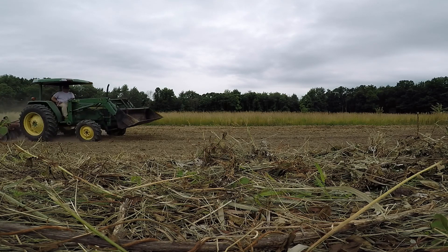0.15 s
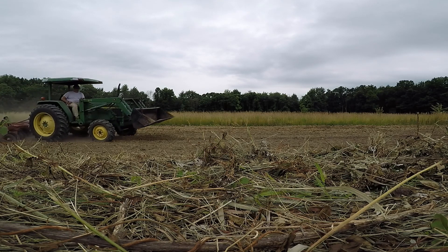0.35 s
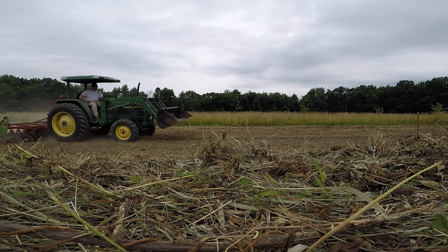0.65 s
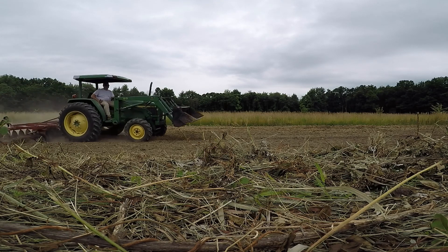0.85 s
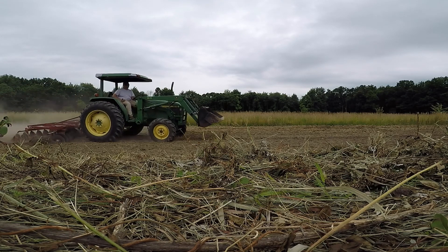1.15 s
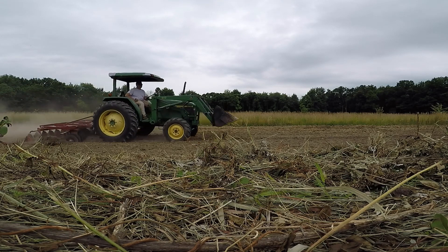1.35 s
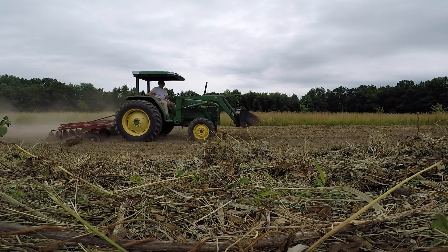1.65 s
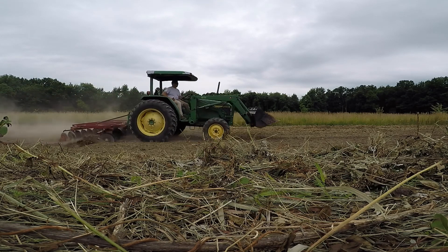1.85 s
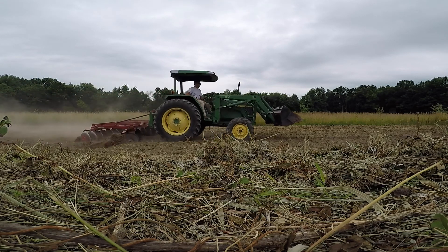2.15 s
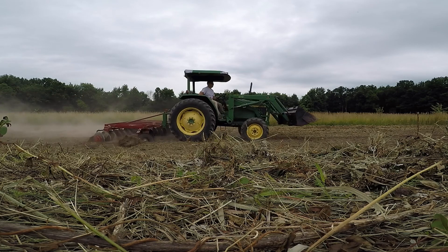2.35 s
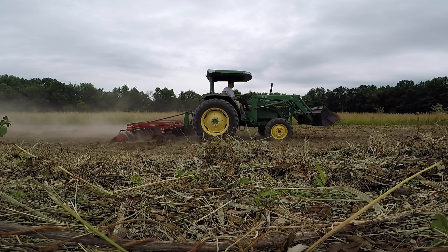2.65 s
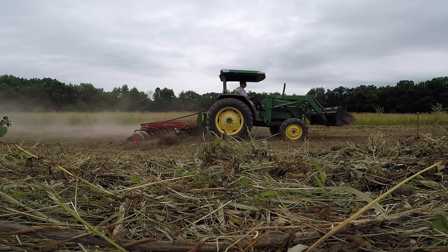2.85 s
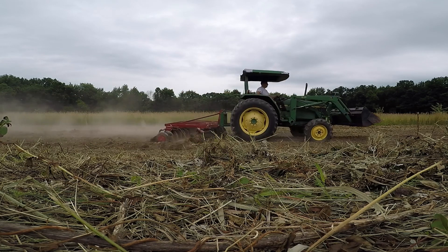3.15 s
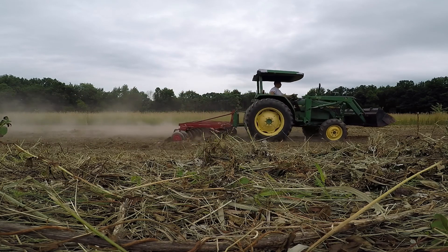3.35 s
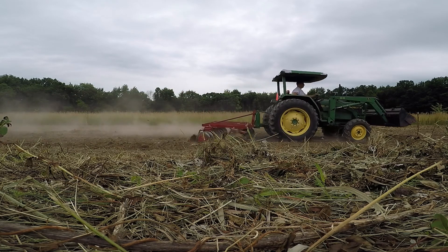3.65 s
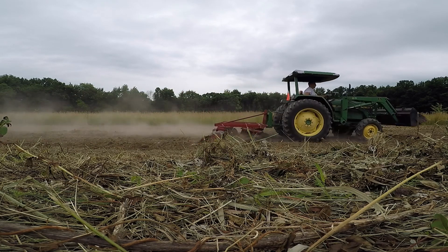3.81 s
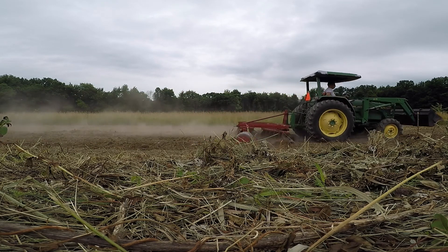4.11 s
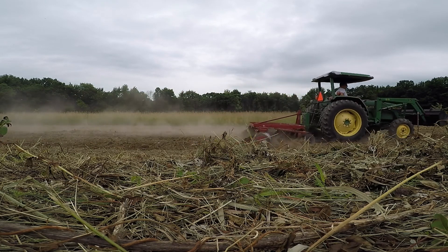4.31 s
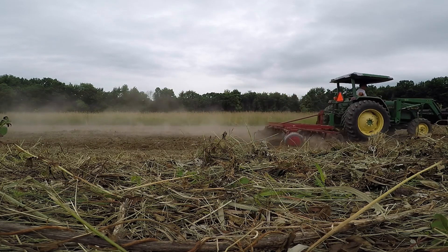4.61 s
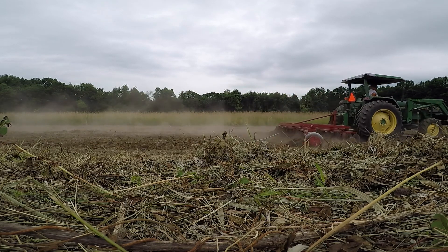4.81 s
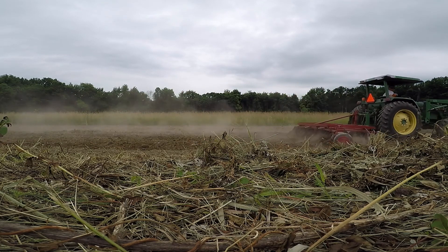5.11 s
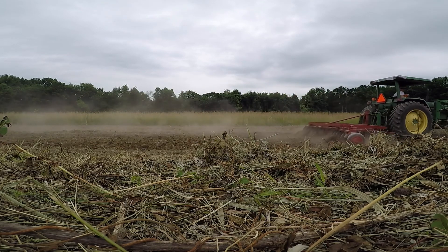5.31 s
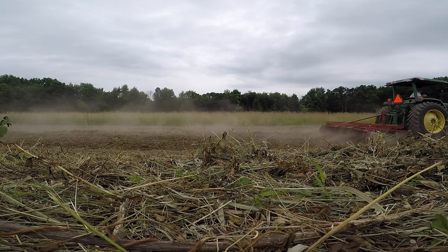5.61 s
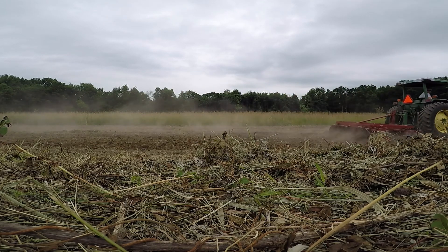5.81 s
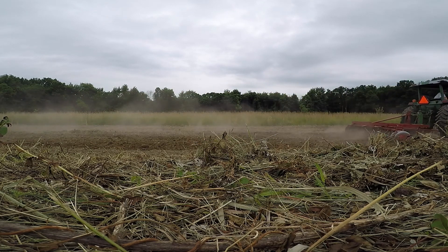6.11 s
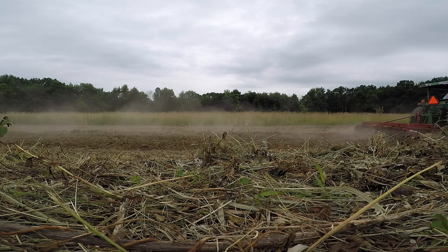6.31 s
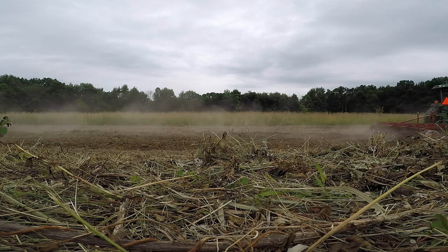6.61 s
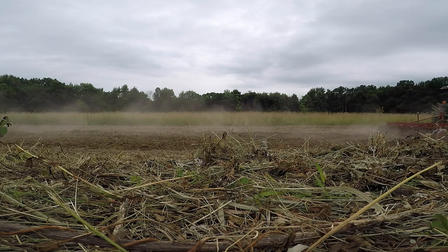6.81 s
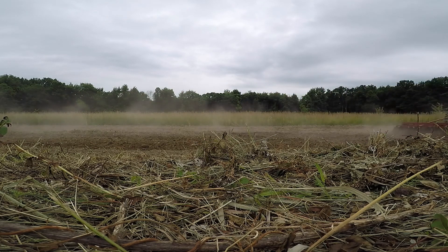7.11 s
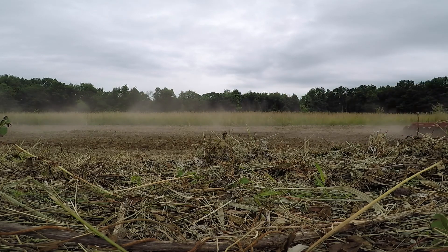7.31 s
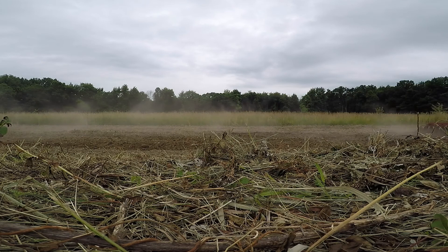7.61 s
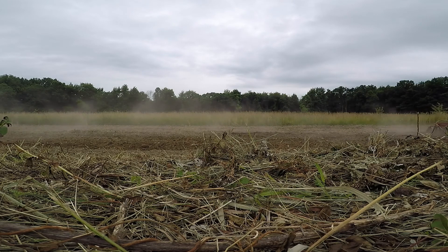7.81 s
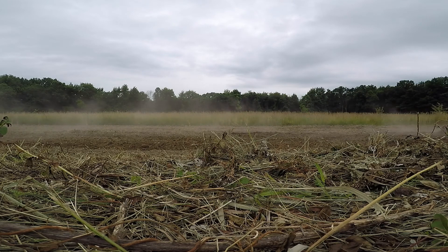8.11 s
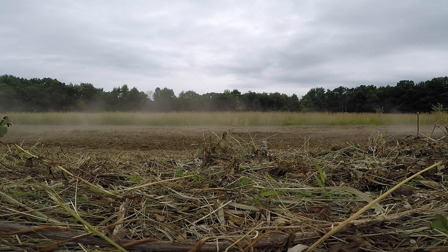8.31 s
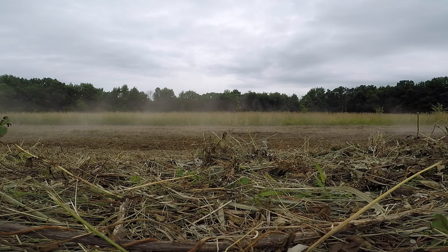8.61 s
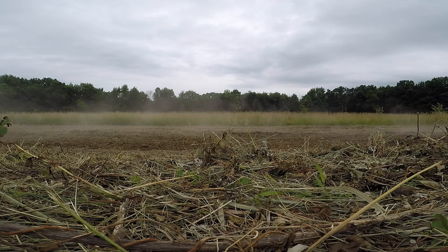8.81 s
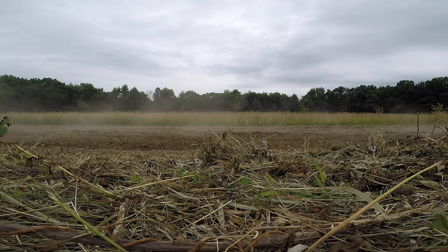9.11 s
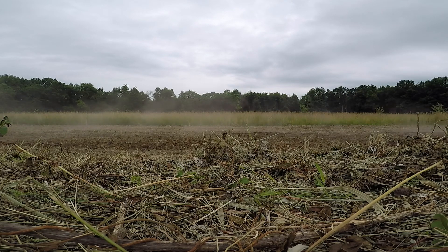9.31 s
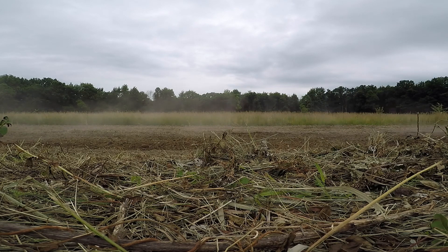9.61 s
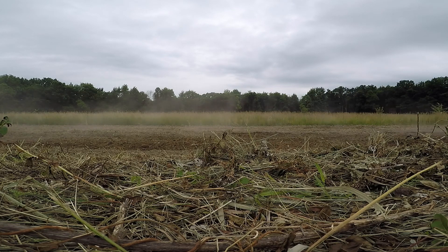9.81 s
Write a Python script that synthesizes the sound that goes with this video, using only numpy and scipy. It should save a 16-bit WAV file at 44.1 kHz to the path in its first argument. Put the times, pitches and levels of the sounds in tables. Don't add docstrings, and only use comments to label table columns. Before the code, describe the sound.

A diesel tractor throbs past from left to right, dragging hissing, squeaking, cracking discs through dry soil, then fades away over an open field.

```python
import sys
import numpy as np
from scipy import signal
from scipy.fft import rfft, irfft, next_fast_len
from scipy.io import wavfile
from scipy.ndimage import uniform_filter1d

SR = 44100
rng = np.random.default_rng(int(sys.argv[2]) if len(sys.argv) > 2 else 0)


def invert_db(level):
    return 10 ** (np.asarray(level, dtype=float) / 20)


def to_wav(sig):
    pcm = np.clip(np.atleast_2d(sig), -1, 1) * 32767
    pcm = np.round(pcm).astype(np.int16)
    wavfile.write(sys.argv[1], SR, pcm.T)


N = 438779
SIZE = next_fast_len(N)
TIME = np.arange(N) / SR
FFT_HZ = np.arange(SIZE // 2 + 1) * SR / SIZE


def rms_one(x):
    return x / np.sqrt(np.mean(x ** 2) + 1e-20)


def in_time(rows):
    s, *columns = np.transpose(rows)
    return [np.interp(TIME, s, c) for c in columns]


def at_hz(points):
    hz, *columns = np.transpose(points)
    return [np.interp(np.log(FFT_HZ + 1), np.log(hz), c) for c in columns]


def band(low_hz, high_hz):
    hz = FFT_HZ + 1
    return 1 / np.sqrt((1 + (low_hz / hz) ** 12) * (1 + (hz / high_hz) ** 12))


def drift(rate):
    r = np.exp(-80 * np.pi * rate / SR)
    noise = rng.standard_normal(N // 40 + 2002)
    slow = signal.lfilter([1], [1, -2 * r, r * r], noise)[2000:]
    return np.interp(np.arange(N) / 40, np.arange(len(slow)), rms_one(slow))


# time in seconds, bearing (0 left, 1 ahead, 2 right, 3 far right).
BEARING = [(0, 0), (1.5, 0.24), (2.3, 1), (3.4, 1.37), (4.2, 1.95), (6.3, 2), (7.6, 3), (9.95, 3)]
# time in seconds, loss in dB.
DISTANCE = [(0, 0), (.8, 0.2), (2.1, -0.1), (3, -1.5), (4.85, -4.5), (6.1, -7), (7.5, -13), (8.6, -15.5),
            (9.95, -18)]
SEEN_FROM = [0, .08, .3, 1, 2, 3]


def heard(source):
    share, *side_db = source
    return np.interp(in_time(BEARING)[0], SEEN_FROM, side_db) + share * in_time(DISTANCE)[0]


def beamed(beams, off_db):
    levels = [off_db]
    for start, end, db in beams:
        outside_s = np.maximum(0, np.maximum(start - TIME, TIME - end))
        levels.append(db - 27.5 * outside_s)
    return np.max(levels, axis=0)


def knocks(cycles, knock_db):
    fading = np.clip(1.2 - cycles / cycles[-1], 0, 1)
    each_firing = knock_db * fading * np.cos(8 * np.pi * cycles)
    return invert_db(each_firing + 0.14 * np.cos(2 * np.pi * cycles))


# frequency in Hz, left and right level in dB per Hz.
FROM_LEFT = [(180,-46,-44.5),(656,-64,-64),(1010,-60,-70),(1970,-51.5,-56.5),(2700,-59,-60),(3480,-57.5,-60),(3570,-60.5,-56),(4250,-58.5,-62),(5250,-57.5,-65),(6100,-65,-65),(7300,-61.5,-70.5),(9640,-72.5,-72.5),(11800,-81,-89),(13200,-97,-101)]
FROM_AHEAD = [(187,-45,-43),(685,-67,-64.5),(1098,-65,-61),(1900,-58,-52.5),(2750,-63.5,-58.5),(3700,-65.5,-59),(4030,-74,-78),(4100,-70.5,-62.5),(5300,-57,-62),(6450,-62,-73),(7360,-59.5,-61),(10600,-69,-69),(12104,-79,-85),(13202,-86,-95)]
FROM_RIGHT = [(208,-51,-50),(684,-74,-65.5),(1000,-80,-62.5),(2200,-72,-57),(2770,-80,-63.5),(3630,-80.5,-66),(3800,-66,-85),(4370,-77.5,-63.5),(5500,-64,-71.5),(6600,-69,-69.5),(7440,-63,-64),(9530,-72.5,-69),(11700,-78,-83),(13200,-92,-87.5)]
# frequency in Hz, likeness from left, ahead, right (0 to 1).
LIKENESS = [(200, 1, 1, 1), (620, .97, .97, .9), (1500, .96, .96, .9), (3700, .96, .9, .98),
            (5300, .88, .88, .998), (6200, .6, .75, .995), (7800, .6, .75, .93), (9500, .35, .7, .75),
            (12000, .4, .6, .9), (14000, .2, .4, .4)]
# frequency in Hz, lag in radians from left, ahead, right, far right.
LAG = [(0, 0, 0, 0, 0), (600, -.6, .1, .6, .8), (1200, .2, -.3, -1.5, -1.7), (2000, .2, -.3, -2, -2.2),
       (2600, .3, -.2, -1.5, -1.7), (3300, .4, .7, 1.9, 2.2), (3700, .4, 1.8, 3.14, 3.14),
       (4200, .1, .3, 6.8, 6.8), (5300, 1.3, 2, 8.2, 9.42), (6100, 2.2, 2.8, 9.42, 10.8),
       (7400, 2, 4.1, 11.3, 11.6), (9300, 4.8, 6.3, 14.6, 15.7), (11800, 9.4, 9.4, 21, 22),
       (14000, 12, 12, 26, 26)]


def ports(side):
    table = (FROM_LEFT, FROM_AHEAD, FROM_RIGHT, FROM_RIGHT)[side]
    left, right = invert_db(np.array(at_hz(table)))
    alike = at_hz(LIKENESS)[min(side, 2)]
    hz, *lags = np.transpose(LAG)
    lag = np.interp(FFT_HZ, hz, lags[side])
    direct = np.array([left * alike * np.exp(-1j * lag), right])
    scattered = left * np.sqrt(1 - alike ** 2) * [[1], [0]]
    return direct, scattered


def wind():
    low = signal.butter(2, [18, 45], "band", fs=SR, output="sos")
    air = signal.sosfilt(low, rng.standard_normal((2, N)))
    return invert_db(-46 + 3.0 * drift(2.5)) * rms_one(air)


def soil(cycles):
    hits = rng.random(N) < 1500 / SR
    size_db = 3.5 * np.minimum(rng.exponential(1, N), 4)
    grit = hits * invert_db(size_db) * rng.choice([-1, 1], N)
    hiss = rng.standard_normal((2, N)) + 0.59 * rms_one(grit) * [[1], [0]]
    return invert_db(1.3 * drift(23)) * knocks(cycles, knock_db=0.93) * hiss


# start in seconds, peak in dB, dull part in dB against the bright part.
CRACKS = [(0.636, -19, -4), (0.7896, -20, -1.5), (3.0103, -17, -10), (3.1485, -20, 4), (3.2686, -15, -4),
          (3.6501, -18, -10), (3.7946, -21, -5), (4.084, -19, -1), (4.195, -27, 1), (4.256, -17, -2),
          (4.335, -11.5, 5), (4.8598, -11.5, -2), (4.9206, -18, -4), (5.052, -17, 1), (5.4161, -18, -9),
          (5.45, -17, -8), (5.5451, -18.5, 1.5), (5.5837, -16.5, -12), (5.7275, -19, -4), (6.1999, -18, -7),
          (6.8586, -26, 6), (6.9381, -21.5, -1), (7.009, -25, -4), (7.3819, -29, 8.5), (7.504, -28.5, 5),
          (7.9441, -24, -3), (8.1748, -22, -15), (8.4291, -27, -4), (8.844, -22.5, -3)]


def cracks():
    gains, t = np.zeros((2, N + SR)), np.arange(SR // 10) / SR
    shape = np.minimum(t / 0.0035, 1) * np.exp(-t / 0.0082)
    ticks = [(9.376 + k * 0.067, -22, -20) for k in range(4)]
    for s, peak_db, dull_db in [*CRACKS, *ticks]:
        burst = invert_db(peak_db + 3.5) * invert_db([[0], [dull_db]]) * shape
        gains[:, int(s * SR):][:, :len(t)] += burst
    bright, dull = rfft(gains[:, :N] * rng.standard_normal((2, N)), SIZE)
    return bright * band(5700, 9200) + dull * band(3300, 6970)


def tones(rows, rise_s, fall_s, early_s, octave_db):
    out, t = np.zeros(N + SR), np.arange(SR // 10) / SR
    shape = (1 - np.exp(-(t / rise_s) ** 2)) * np.exp(-(t / fall_s) ** 2)
    for s, peak_db, hz in rows:
        wave = np.sin(2 * np.pi * hz * t) + invert_db(octave_db) * np.sin(4 * np.pi * hz * t)
        out[int((s - early_s) * SR):][:len(t)] += invert_db(peak_db) * shape / shape.max() * wave
    return out[:N]


# start in seconds, peak in dB, pitch in Hz.
PINGS = [
    (.787, -23, 5040),
    (4.338, -29, 8750),
    (5.643, -22, 9300),
    (5.724, -17, 8380),
    (5.73, -24, 9150),
    (6.115, -28, 9290),
]


def pings():
    return tones(PINGS, rise_s=0.0017, fall_s=0.016, early_s=0, octave_db=-56)


# time of the peak in seconds, peak in dB, pitch in Hz.
SQUEAKS = [
    (0.3194, -22, 4250),
    (2.0133, -29, 4260),
    (2.3351, -25, 4195),
    (5.7273, -25.5, 4177),
    (5.9154, -33, 4325),
    (5.9399, -21.5, 4254),
    (6.1799, -20.5, 4240),
    (7.1758, -30.5, 4296),
    (8.0587, -32.5, 4210),
]


def squeaks():
    return tones(SQUEAKS, rise_s=0.0091, fall_s=0.018, early_s=0.0079, octave_db=-12)


def clatter(cycles, repeat, knock_db, uneven_db):
    favoured = np.clip(rng.standard_normal((12, 1201)), -1.5, 1.5)
    panels = rms_one(uniform_filter1d(rng.standard_normal((12, 1201)), size=6))
    order_db = uneven_db * favoured + 2.0 * np.clip(panels, -1.6, 1.6)
    patterns = rms_one(irfft(rfft(rng.standard_normal((12, 2400))) * invert_db(order_db)))
    where = (cycles % 1 * 2400).astype(int)
    age = cycles / cycles[-1] * 10.999
    now, share = age.astype(int), (age % 1) * np.pi / 2
    looped = np.cos(share) * patterns[now, where] + np.sin(share) * patterns[now + 1, where]
    fresh = np.sqrt(1 - repeat ** 2) * rng.standard_normal(N)
    return knocks(cycles, knock_db) * (repeat * looped + fresh)


# frequency in Hz, level in dB per Hz.
RUMBLE = [(15, -24), (30, -24), (50, -2), (100, 7.5), (200, 6.5), (300, -1), (420, -2), (600, -35)]
# share of the distance loss, then dB at each bearing of SEEN_FROM.
RUMBLING = (0.64, -36.5, -39, -35, -34.5, -32.5, -32.5)


def rumble(cycles):
    rough = clatter(cycles, repeat=0.25, knock_db=3.0, uneven_db=9.0)
    low = irfft(rfft(rough, SIZE) * invert_db(at_hz(RUMBLE)[0]), SIZE)[:N]
    return invert_db(heard(RUMBLING) + 10.5) * rms_one(low)


GEAR_ORDERS = [26.03, 39.45, 52.06, 57.85, 63.0, 77.25, 56.0, 93.5]
# beam start and end in seconds, level in dB.
GEAR_BEAMS = [
    [(0, .9, -40.5), (1.1, 1.5, -36.5), (2.5, 3.6, -37), (5.2, 6.2, -43.5), (8.5, 9.4, -53)],
    [(1.2, 1.5, -43), (3.9, 4.6, -38), (5.3, 6.65, -38.5), (6.8, 7.8, -47)],
    [(.5, 2.3, -45), (2.4, 3.21, -38)],
    [(.3, .9, -41), (2.5, 2.9, -40), (3.8, 4.2, -44), (7.25, 7.9, -45), (7.9, 9.4, -45.5)],
    [(.6, 1.5, -36), (2.5, 3.2, -39.5), (4.4, 4.8, -46)],
    [(1.2, 2.1, -36.5), (2.2, 3.6, -35.5), (5.0, 6.4, -47)],
    [(4.5, 5.0, -47), (5.35, 6.3, -44)],
    [(4.05, 4.45, -37)],
]


def gears(cycles):
    off_db = -47 + in_time(DISTANCE)[0]
    out = np.zeros(N)
    for order, beams in zip(GEAR_ORDERS, GEAR_BEAMS):
        level_db = beamed(beams, off_db) + 1.5 * drift(5.4)
        out += np.sqrt(2) * invert_db(level_db) * np.cos(2 * np.pi * order * cycles + 0.44 * drift(4))
    return out


# time in seconds, rate in Hz.
FIRING = [(0, 76.64), (2.1, 76.62), (3.3, 75.89), (4.5, 75.26), (6.2, 74.97), (6.9, 75.91), (9.95, 75.9)]
# time in seconds, depth in % of speed.
SAGS = [(.01, 1.9), (.68, 1.46), (1.1, 1.18), (1.55, 1.0), (2.03, 0.59), (2.58, 1.38), (2.87, 1.1),
        (3.5, .6), (4.03, 1.51), (4.7, 0.82), (5.33, 1.59), (6.33, 0.81), (6.83, 2.8), (7.39, 2.76),
        (8.12, 2.19), (8.72, 3.08), (9.22, 2.04), (9.95, .6)]


def crank():
    sag = sum(depth * np.exp(-((TIME - s) / 0.15) ** 2) for s, depth in SAGS)
    return np.cumsum(in_time(FIRING)[0] * (1 - sag / 100)) / (4 * SR)


# share of the distance loss, then dB at each bearing of SEEN_FROM.
FIRING_TONE = (.3, -17.5, -17.5, -15, -14, -14, -12)
OCTAVE_TONE = (0.57, -12, -15, -16.5, -18.5, -16.5, -16)
# beam start and end in seconds, level in dB.
EXHAUST_BEAMS = [
    [(.4, 1.9, -38), (3.9, 7.8, -22.5), (6.7, 9.95, -14)],
    [(.95, 2.05, -30), (5.4, 5.55, -29), (6.4, 6.55, -27), (7.4, 7.6, -24.5), (8.4, 9.05, -27.5),
     (9.85, 9.95, -21)],
    [(.9, 1.6, -28), (2.4, 4.6, -23.5), (4.6, 7.6, -26.5), (7.6, 9.5, -29.5)],
    [(.95, 2.1, -30), (2.8, 3.7, -27.5), (3.7, 9.5, -31)],
]
EXHAUST_SHARES = [0.83, .4, 0.73, 0.76]
# multiple of the cycle rate, dB against a level that slides from the firing
MINOR = [(1, -46), (2, -29.5), (3, -27.5), (5, -20.5), (6, -29), (10, -24.5), (11, -22), (13, -35),
         (14, -27.5), (15, -25), (17, -28.5), (20, -38.5), (22, -33.5), (24, -30.5)]


def exhaust(cycles):
    turn = 2 * np.pi * cycles
    firing_db = heard(FIRING_TONE) + 0.7 * drift(3.2)
    octave_db = heard(OCTAVE_TONE) + 0.77 * drift(4.0)
    out = invert_db(firing_db) * np.cos(4 * turn)
    out += invert_db(octave_db + 1.0 * drift(14.0)) * np.cos(8 * turn + 3.0)
    swing = np.clip(cycles / cycles[-1] * 1.7, 0, 1)
    for order, beams, share in zip((7, 9, 12, 16), EXHAUST_BEAMS, EXHAUST_SHARES):
        level_db = beamed(beams, np.full(N, -36.5)) + share * in_time(DISTANCE)[0]
        phase = 2.48 * swing - 1.5 + 0.68 * drift(5.3)
        out += invert_db(level_db + 1.0 * drift(3.0)) * np.cos(order * turn + phase)
    for order, rel_db in MINOR:
        fade_db = firing_db + (octave_db - firing_db) * min(order / 16.0, 1)
        level_db = fade_db + rel_db + 1.0 + 3.7 * drift(3.9)
        out += invert_db(level_db) * np.cos(round(order) * turn + 1.7 * drift(0.54))
    return np.sqrt(2) * out


BAND_EDGES_HZ = [480, 3700, 6300]
# share of the distance loss, then dB at each bearing of SEEN_FROM.
CLATTERING = (1.1429, -22.5, -21.5, -22, -21, -20.5, -18.5)
RATTLING = (1.04, -29.5, -30.5, -42, -36, -34.5, -35.5)
HISSING = (0.58, -38, -42, -39.5, -37.5, -33.5, -35)


def scene():
    cycles = crank()
    point = exhaust(cycles) + rumble(cycles) + gears(cycles) + squeaks() + pings()
    point = rfft(point, SIZE) + cracks()
    edges = [*BAND_EDGES_HZ, 16000]
    shapes = [band(low, high) for low, high in zip(edges, edges[1:])]
    noise_db = [heard(source) for source in (CLATTERING, RATTLING, HISSING)]
    engine_echo = rfft(clatter(cycles, repeat=0.6, knock_db=1.0, uneven_db=3.0), SIZE)
    bearing = np.clip(in_time(BEARING)[0], 0, 3.0)
    out = wind()
    for side in range(4):
        share = np.clip(1 - abs(bearing - side), 0, 1)
        direct, scattered = ports(side)
        difference = direct / np.sqrt(np.mean(abs(direct) ** 2, axis=0))
        out = out + share * irfft(difference * point, SIZE)[:, :N]
        engine = rfft(clatter(cycles, repeat=0.75, knock_db=1.5, uneven_db=2.5), SIZE), engine_echo
        earth = rfft(soil(cycles), SIZE)
        for (near, far), shape, level_db in zip((engine, earth, earth), shapes, noise_db):
            at_ports = irfft(shape * (direct * near + scattered * far), SIZE)[:, :N]
            out = out + np.sqrt(share) * invert_db(level_db) * at_ports / np.std(at_ports.mean(axis=0))
    return out


def band_limit(x):
    return signal.sosfilt(signal.butter(12, 15060, fs=SR, output="sos"), x)


def record(dry):
    dry = signal.sosfilt(signal.butter(10, 13900, fs=SR, output="sos"), dry)
    mix = 1.483 * np.tanh(dry / 1.518) + 0.0017
    return band_limit(mix)


dry = scene()
out = record(dry)
to_wav(out)
```